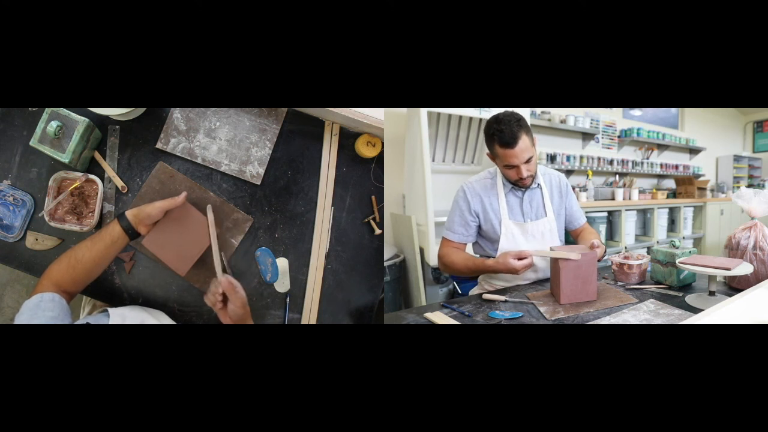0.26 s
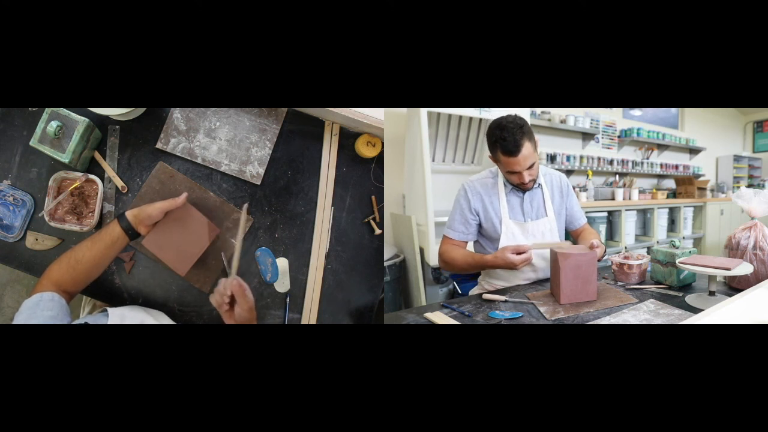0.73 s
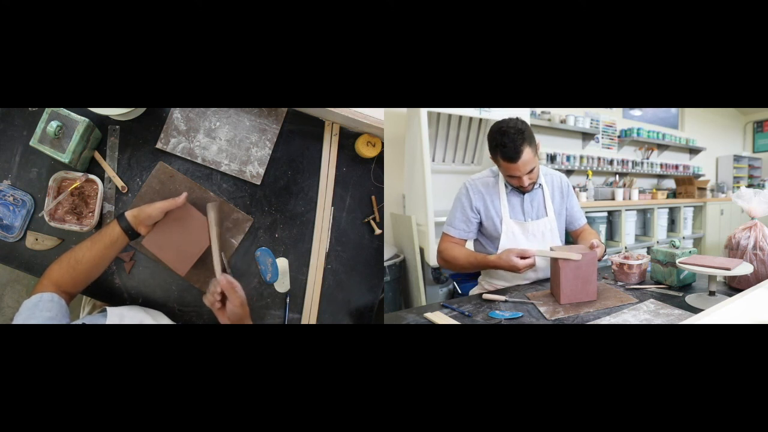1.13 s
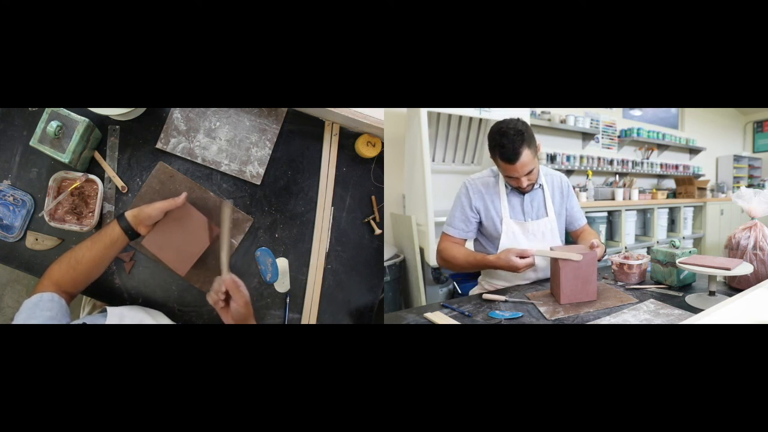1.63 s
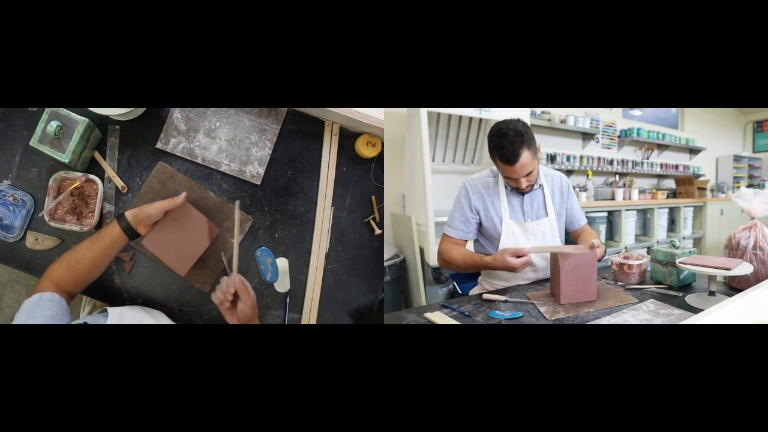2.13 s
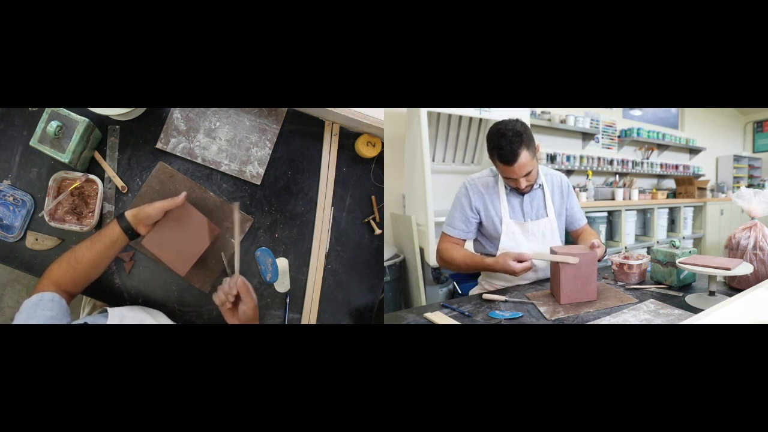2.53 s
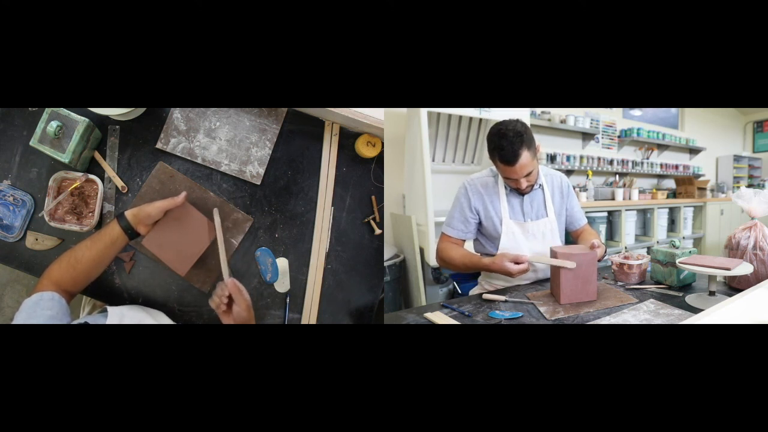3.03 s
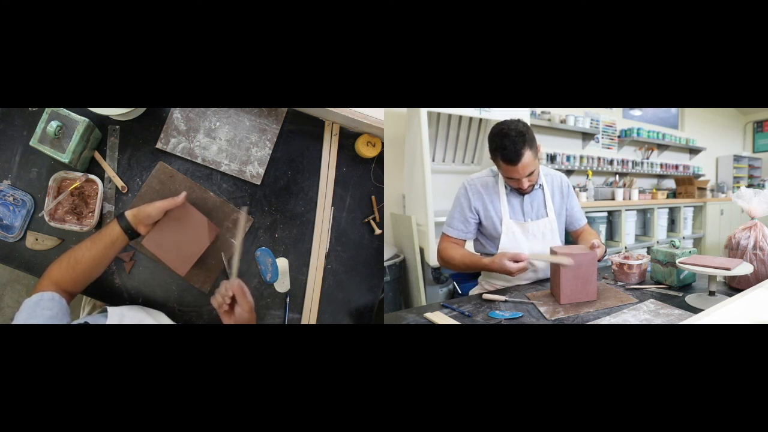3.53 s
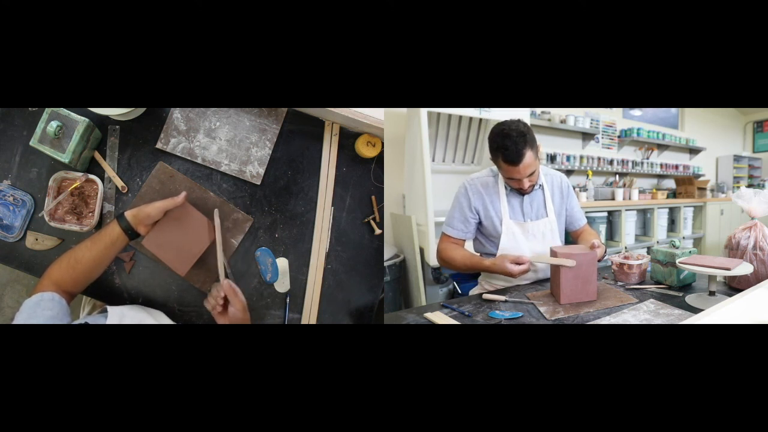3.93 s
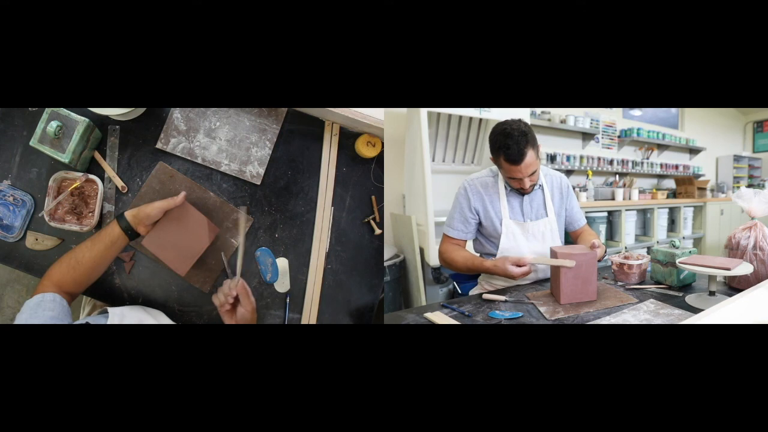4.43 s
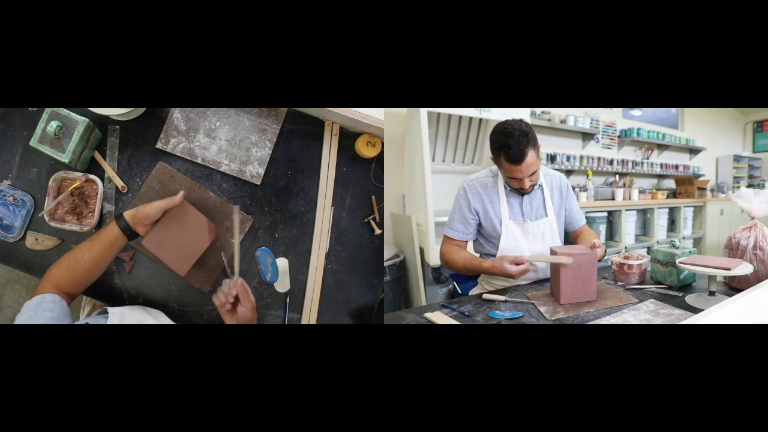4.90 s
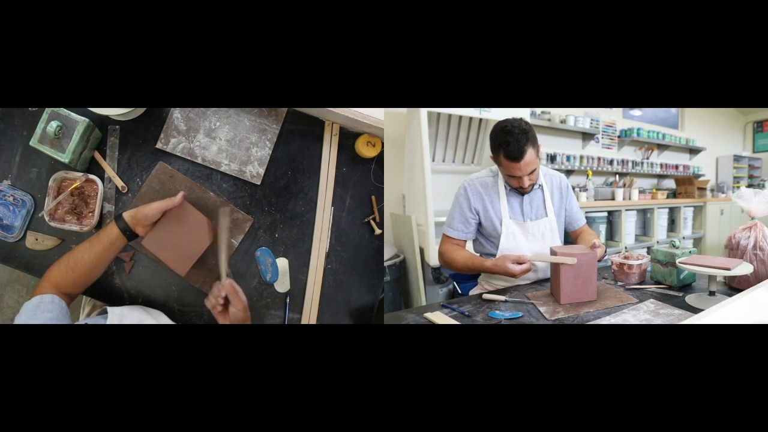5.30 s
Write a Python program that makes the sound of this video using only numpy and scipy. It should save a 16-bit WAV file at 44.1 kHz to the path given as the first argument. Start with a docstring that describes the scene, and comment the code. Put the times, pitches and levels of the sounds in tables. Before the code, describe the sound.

A wooden paddle strikes a hollow, soft clay block about six times a second without pause. Each pat is a crisp click with a dull hollow thud and woody knock. Around the middle the blows move to another spot and many grow softer. Close, clear pickup in a small, lively workshop with a faint low hum.

```python
"""A wooden paddle pats a hollow block of soft clay about six times a second in a quiet workshop.
Each blow is a filtered click with a noise crackle and decaying resonances, then a weaker second touch.
Bench, walls and ceiling return it as scattered echoes and three noise-like tails that trade places.
Shaped noise makes a low rumble with faint hiss, a wavering sine the hum; a noise gate lowers quiet bands."""
import sys
import numpy as np
from scipy import signal
from scipy.fft import rfft, irfft
from scipy.io import wavfile
from scipy.ndimage import uniform_filter1d

SR = 44100
rng = np.random.default_rng(int(sys.argv[2]) if len(sys.argv) > 2 else 0)


def wav_out(sig):
    """Save sig, one row per channel (or a flat mono array), as 16-bit PCM at SR to the path in sys.argv[1]."""
    wavfile.write(sys.argv[1], SR, np.round(np.clip(np.atleast_2d(sig).T, -1, 1) * 32767).astype(np.int16))


N = 244868


def gain_of(db):
    """Decibels to amplitude gain."""
    return 10 ** (np.asarray(db) / 20)


def read(points, hz):
    """Interpolate a (hz, value) table on a log-frequency axis."""
    f, value = np.transpose(points)
    return np.interp(np.log(hz + 1), np.log(f + 1), value)


def room_tone():
    """Noise shaped to a low rumble with faint treble hiss, plus a hum wavering in level and phase."""
    # rumble spectrum before its level is set: hz, level_db
    rumble_colour = [(25, -28.5), (45, -25.5), (60, -14), (100, -15.5), (200, -9.5), (400, -7.5),
                     (900, -12), (3000, -22), (6300, -56), (7200, -30.5), (8200, -53), (16000, -60.5)]
    rumble_rms_db, hum_rms_db, hum_hz = -55, -66.5, 120  # levels ahead of record(); hum at zero waver
    waver_db, waver_rad = 5.5, 1.3  # per standard deviation

    hz, t = np.fft.rfftfreq(N, 1 / SR), np.arange(N) / SR
    noise = rng.standard_normal(N)
    rumble = irfft(rfft(noise) * gain_of(read(rumble_colour, hz)), N)
    rumble *= gain_of(rumble_rms_db) / rumble.std()

    waver = uniform_filter1d(uniform_filter1d(rng.standard_normal((2, N)), 1500), 1500)
    waver /= waver.std()
    hum_peak = np.sqrt(2) * gain_of(hum_rms_db + waver_db * waver[0])
    hum = hum_peak * np.sin(2 * np.pi * hum_hz * t + waver_rad * waver[1])
    return rumble + hum


def causal(colour_db):
    """Minimum-phase click of this spectrum: the phase follows from the log gain."""
    log_gain = np.log(gain_of(np.concatenate([colour_db, colour_db[-2:0:-1]])))
    return np.fft.ifft(np.exp(np.conj(signal.hilbert(log_gain)))).real


def ring(x, hz, width_hz):
    """A two-pole resonance applied twice, so it swells softly and has steep skirts; peak 1."""
    r = np.exp(-np.pi * width_hz / SR)
    poles = [1, -2 * r * np.cos(2 * np.pi * hz / SR), r * r]
    once = signal.lfilter([1, 0, -1], poles, x)
    twice = signal.lfilter([1, 0, -1], poles, once)
    return twice / abs(twice).max()


def paddle():
    """Click and rings mixed anew per blow, touching twice; row 0 near sound, row 1 feeds the tails."""
    # blows: start_s, strength_db, then against the strength: thud_db, knock_db, slap_db, fizz_db
    blows = [(0.0275, -18.5, -2.5, -6, -4, 1), (0.2055, -15, -5, -9.5, -3, -1),
             (0.386, -17.5, -12, -5, -7.5, -14), (0.5667, -20.5, -9.5, -3.5, -7, -10),
             (0.7572, -26, -8, -3.5, 7.5, -4.5), (0.9396, -17, -8, -4.5, -3.5, 2),
             (1.1165, -17, -7.5, -12, -5.5, -2.5), (1.2898, -19.5, -8.5, -10.5, -13, -13),
             (1.4625, -18.5, -5.5, -6.5, 3, 4.5), (1.6342, -16.5, -6.5, -10, -14, -7),
             (1.8106, -13, -8.5, -18.5, -19, -12.5), (1.9871, -17, -4, -2, 1, -3.5),
             (2.161, -19.5, -2, -6.5, -7.5, -2.5), (2.3311, -14, -4, -7.5, -1.5, 2),
             (2.5028, -17.5, -5.5, -4, -9, -1), (2.6752, -32, -6, -3, -0.5, 1),
             (2.8464, -27.5, -6.5, -1, -10, -5), (3.0145, -25, -11.5, -8.5, -5, -4.5),
             (3.1959, -27.5, -10.5, -9, -1.5, -3.5), (3.3713, -22.5, -10, -1, -18.5, -10.5),
             (3.5459, -15, -10.5, -4, -8, -13.5), (3.7265, -14.5, -10, -0.5, -17.5, -10),
             (3.902, -23, -4.5, -6.5, -7.5, -0.5), (4.0759, -27, 0.5, -1, -0.5, 0.5),
             (4.2421, -18.5, -5.5, 0, -18, -5), (4.4077, -24.5, -2, -3, -16.5, -18),
             (4.575, -32.5, -3.5, -4.5, -9, -12.5), (4.7487, -29, -7, -3, -12, -9),
             (4.9191, -26.5, -1.5, -1.5, -10.5, -7), (5.0892, -16, -6.5, 0, -9, -10.5),
             (5.2641, -34, 6, 2.5, 2.5, -2), (5.435, -17.5, -3, 0, -9, -7)]
    # part levels: medium_blow_db, added_after_move_db, then the share followed of:
    #   strength, thud, knock, slap, fizz (dB per dB)
    # rows: clay thud, clay wall, paddle low bend, paddle high bend, knock, slap low, slap middle, slap high
    part_levels = [(-28, 2, 0.73, .95, 0.018, 0, 0.013), (-27, -4.5, 0.28, 0, 0.12, 0.016, 0),
                   (-36.5, 4, 0.31, 0, 0.03, 0.008, 0), (-28.5, -1.5, 0.72, 0.094, 0, 0.12, 0.03),
                   (-26, -4.5, 0.78, 0.035, 0.79, 0.082, 0), (-28, -6, .45, 0, 0.029, 0.046, 0),
                   (-32, -0.65, 1, 0.059, 0.04, 0.78, 0), (-28, -1.9, 0.92, 0.01, 0, 0.015, 0.98)]
    # contact click colour, raised by its part's level: part (row above), hz, level_db
    click_colour = [(0, 40, -73.5), (0, 35, -33), (0, 270, -7), (0, 400, 8), (1, 680, 0.7), (1, 800, 0.5),
                    (2, 984, 3), (3, 1703, 6.5), (4, 2200, 1.5), (4, 3160, -2.4), (5, 2800, -3.5),
                    (5, 3100, -4), (6, 7000, 2.5), (7, 9050, -4), (7, 12200, -8.5), (7, 18000, -20.5)]
    # resonances, raised by their part's level: part (row above), hz, width_hz (each pass), peak_db
    resonances = [(0, 483, 97.2, 9.5), (2, 1038, 120, 3.3), (3, 1554, 86.4, 0.6), (4, 2586, 500, 9),
                  (5, 3964, 250, -1.5)]
    # second touch, rows before and after the move: delay_ms, spread_ms, medium_blow_db, db_per_strength_db
    touches = [(0.82, 0.46, -19, 0.2), (0.777, .015, -9, -0.24)]
    medium_db = -20  # strength of a medium blow
    move_s = 2.59  # later blows land on another spot
    crackle_ms, crackle_db = 0.48, -8  # wet clay crackles under the flat face; decay to 1/e
    click_db = 32.5
    tail_rings_db = -14  # level of the rings fed to the tails, for a less tonal reverberation
    touch_hz = 4440  # low-pass corner of the second touch, which is duller

    out = np.zeros((2, N + SR))
    t, hz = np.arange(2048) / SR, np.fft.rfftfreq(2048, 1 / SR)
    push = (t == 0) * 1.
    duller = signal.butter(2, touch_hz, fs=SR, output="sos")
    rings = [(int(part), gain_of(db) * ring(push, f, width)) for part, f, width, db in resonances]
    crackles = rng.standard_normal((len(blows), len(t)))
    crackles *= gain_of(crackle_db) * np.exp(-1000 * t / crackle_ms)
    slips = rng.uniform(-1.1, 1, len(blows))

    for (start_s, blow_db, *mix_db), crackle, slip in zip(blows, crackles, slips):
        moved = int(start_s > move_s)
        harder_db = blow_db - medium_db
        parts_db = [db + moved * moved_db + np.dot(shares, [harder_db, *mix_db])
                    for db, moved_db, *shares in part_levels]

        colour = [(f, db + parts_db[int(part)]) for part, f, db in click_colour]
        click = gain_of(click_db) * causal(read(colour, hz))
        rung = sum(gain_of(parts_db[part]) * sound for part, sound in rings)
        crackled = signal.fftconvolve(click, crackle)[:len(t)]
        near = click + crackled + rung
        tail_feed = click + gain_of(tail_rings_db) * rung  # no crackle, quieter rings
        blow = np.array([near, tail_feed])

        delay_ms, spread_ms, touch_db, db_per_db = touches[moved]
        touch_db += db_per_db * harder_db
        again = gain_of(touch_db) * signal.sosfilt(duller, blow)
        again_s = start_s + abs(delay_ms + spread_ms * slip) / 1000
        for at_s, sound in ((start_s, blow), (again_s, again)):
            at = round(at_s * SR)
            out[:, at:at + len(t)] += sound
    return out[:, :N]


def early_echoes():
    """Single reflections, each smeared by shelves and jars."""
    # reflections: delay_ms, level_db
    echoes = [(.65, -16), (1.3, -11.5), (2.4, -16), (6.2, -18.5), (10.4, -23), (11.5, -13), (15.5, -37.5),
              (18.3, -21.5), (23.5, -23), (28, -33)]
    scatter_ms, scatter_db = 0.66, -10.5  # decay to 1/e; noise level before differencing

    early, lag_s = np.zeros(4096), np.arange(256) / SR
    smears = rng.standard_normal((len(echoes), len(lag_s)))
    smears *= gain_of(scatter_db) * np.exp(-1000 * lag_s / scatter_ms)
    for (delay_ms, db), smear in zip(echoes, smears):
        at = round(delay_ms * SR / 1000)
        scattered = np.gradient(smear)  # small things scatter mostly treble
        early[at:at + len(lag_s)] += gain_of(db) * ((lag_s == 0) + scattered)
    return early


def tail():
    """Dense taps of random sign, with a frequency-dependent decay."""
    # reverberation time: hz, t60_s
    decay = [(120, 0.57), (450, 0.57), (1000, 0.33), (2000, 0.48), (4000, 0.43), (8000, 0.35),
             (15000, 0.33)]
    # tail colour before tail_db: hz, level_db
    colour = [(120, 7.5), (450, -1.5), (1000, 3.5), (1600, -3), (2600, -1), (5000, -3), (9000, -2),
              (15000, -9)]
    slot, build_up_s, tail_db = 12, 0.0013, -21  # slot in samples, one tap each

    taps, slots = np.zeros(SR), np.arange(0, SR - slot, slot)
    places = slots + rng.integers(0, slot, len(slots))
    taps[places] = rng.choice([-1., 1.], len(slots))
    taps *= 1 - np.exp(-(np.arange(SR) / SR / build_up_s) ** 2)  # builds up as echoes multiply
    hz, t, z = signal.stft(taps, SR, nperseg=256)
    decay_db = 60 * t / read(decay, hz)[:, None]
    z *= gain_of(read(colour, hz)[:, None] - decay_db)
    return signal.istft(z, SR, nperseg=256)[1] * gain_of(tail_db)


def workshop(near, tail_feed):
    """Early echoes of the near sound, and three tails of the tail feed that trade places."""
    round_s = 1.103  # one round of the three tails, which keeps the reverberation from repeating
    turn = np.arange(N) / SR / round_s
    wet = signal.fftconvolve(near, early_echoes())[:N]
    for k in range(3):
        share = np.sqrt(2 / 3) * np.cos(2 * np.pi * (turn + k / 3))  # squares sum to 1
        wet += signal.fftconvolve(tail_feed * share, tail())[:N]
    return wet


def scene():
    """Paddle, its echoes and the room tone."""
    near, tail_feed = paddle()
    return (near + workshop(near, tail_feed) + room_tone())[None]


def record(dry):
    """Low cut; a gate lowers each band that falls quiet; peaks are rounded off; then the band limit."""
    # gate threshold per STFT bin: hz, threshold_db
    threshold = [(60, -76), (150, -70.5), (500, -54), (1200, -71.5), (1950, -52), (2500, -83),
                 (3250, -59.5), (4200, -85.5), (6000, -72), (7200, -89.5), (8500, -73), (16000, -106.5)]
    low_cut_hz, second_low_cut_hz, edge_hz = 70, 40, 17050
    gate_slope = 2  # gain lost in dB per dB under the threshold
    gate_memory_s, hop = 0.024, 128  # hop in samples
    drive_db, ceiling = 3.0, 1.1  # ceiling of the rounding, ahead of the last filters

    cut = signal.sosfilt(signal.butter(4, low_cut_hz, "high", fs=SR, output="sos"), dry)
    hz, _, z = signal.stft(cut, SR, nperseg=512, noverlap=512 - hop)
    keep = np.exp(-hop / (gate_memory_s * SR))
    power = uniform_filter1d(abs(z) ** 2, size=4, axis=1)  # averaged over neighbouring bins
    power = signal.lfilter([1 - keep], [1, -keep], power)
    power_db = 10 * np.log10(abs(power) + 1e-16)
    under_db = np.minimum(power_db - read(threshold, hz)[:, None], 0)
    z_gated = z * gain_of(gate_slope * under_db)
    gated = signal.istft(z_gated, SR, nperseg=512, noverlap=512 - hop)[1][:, :N]

    held = ceiling * np.tanh(gain_of(drive_db) * gated / ceiling)
    held = signal.sosfilt(signal.butter(2, second_low_cut_hz, "high", fs=SR, output="sos"), held)
    band_limit = signal.firwin(511, edge_hz, window=("kaiser", 10), fs=SR)
    return signal.oaconvolve(held, band_limit[None], "same")


dry = scene()
out = record(dry)
wav_out(out)
```